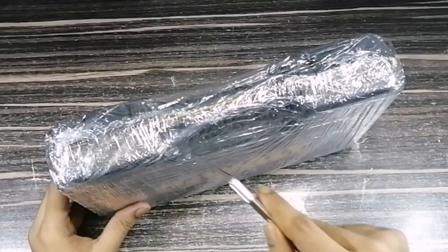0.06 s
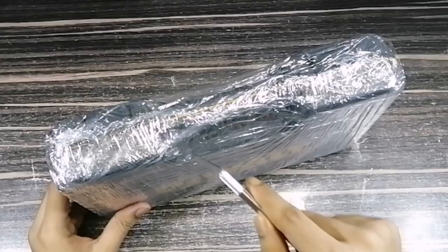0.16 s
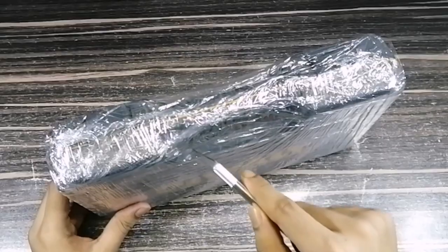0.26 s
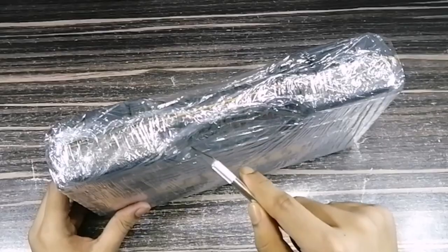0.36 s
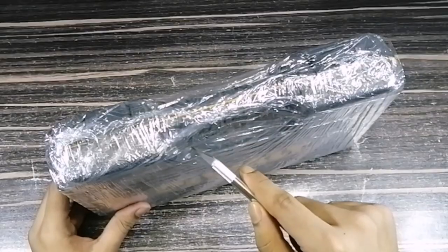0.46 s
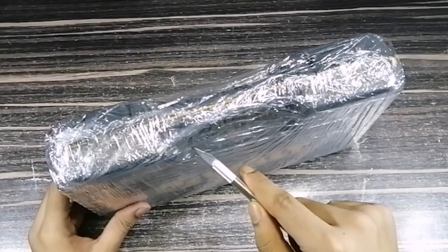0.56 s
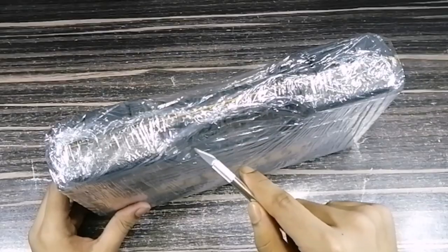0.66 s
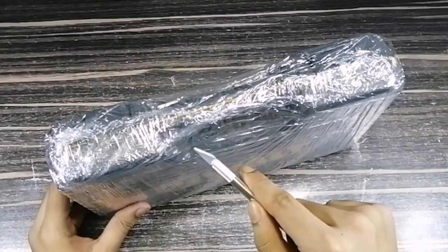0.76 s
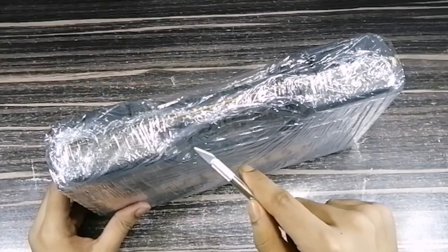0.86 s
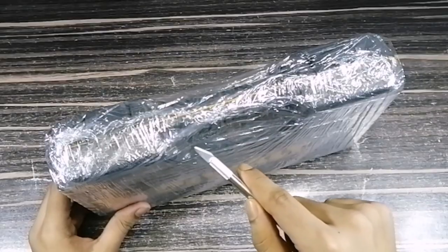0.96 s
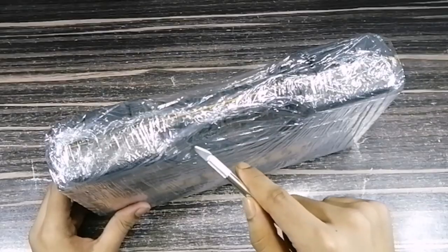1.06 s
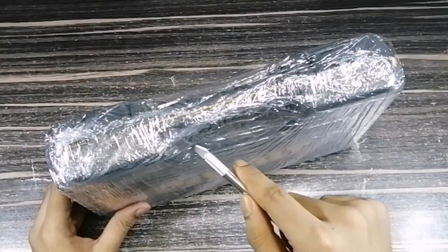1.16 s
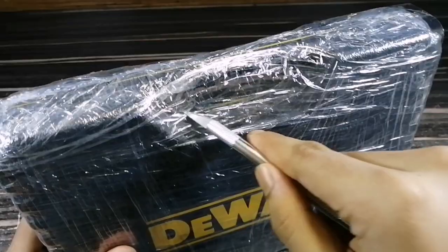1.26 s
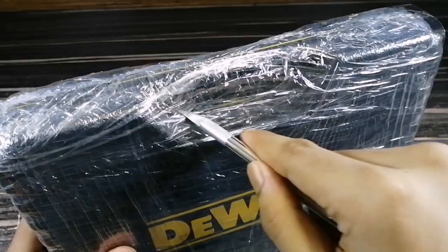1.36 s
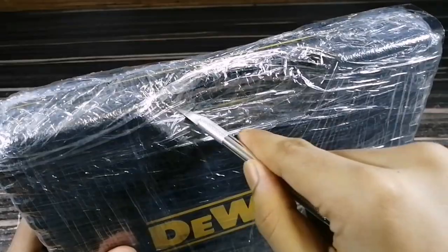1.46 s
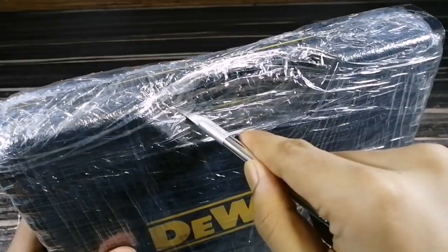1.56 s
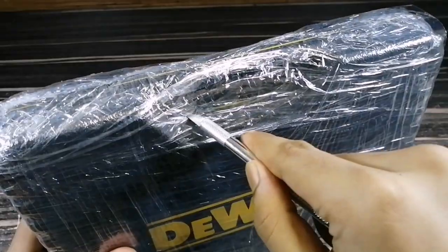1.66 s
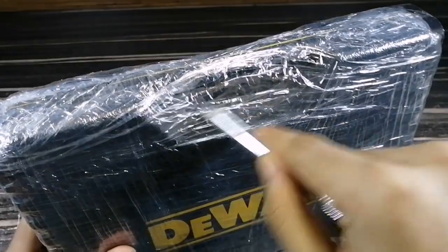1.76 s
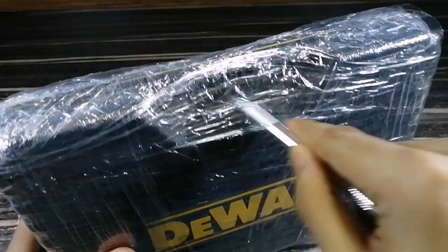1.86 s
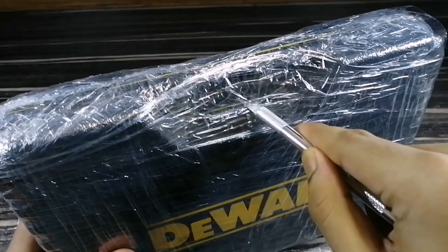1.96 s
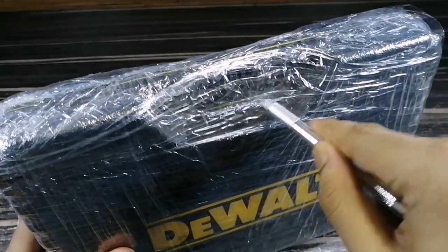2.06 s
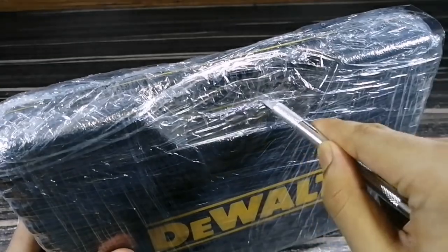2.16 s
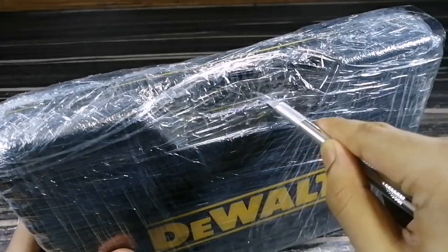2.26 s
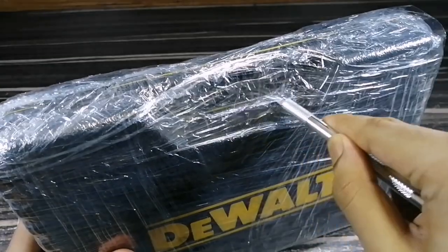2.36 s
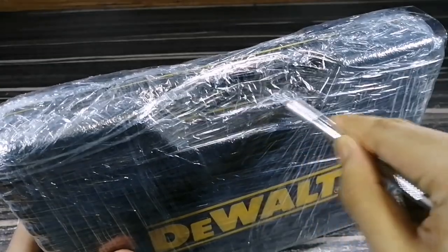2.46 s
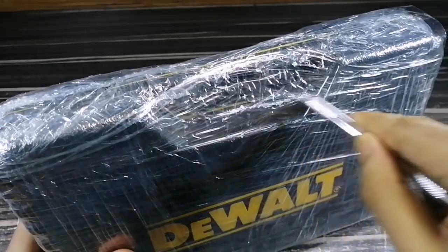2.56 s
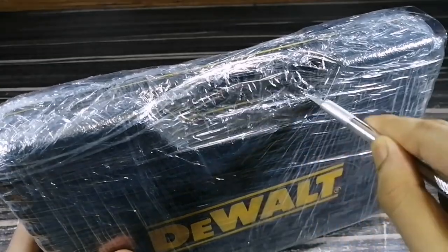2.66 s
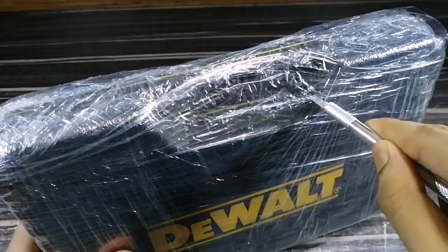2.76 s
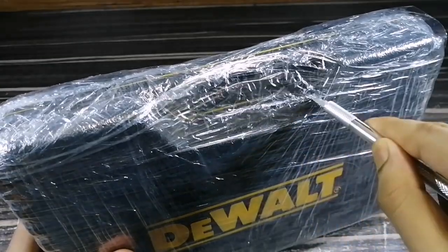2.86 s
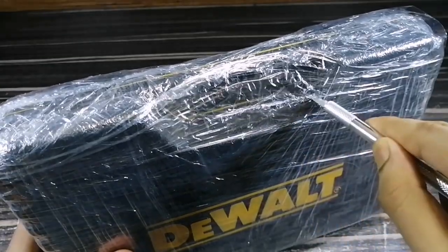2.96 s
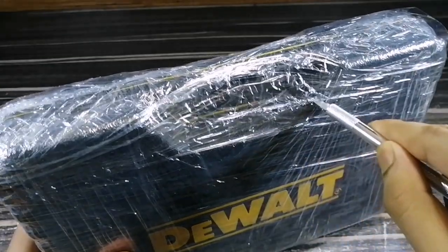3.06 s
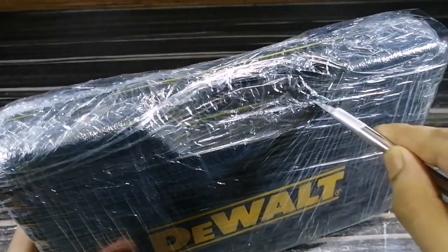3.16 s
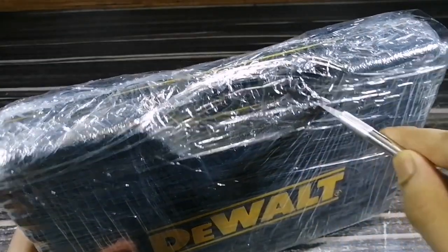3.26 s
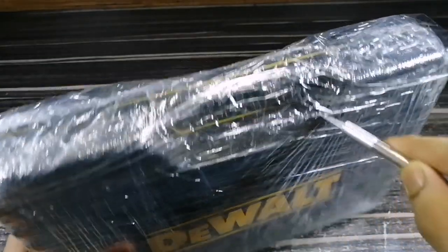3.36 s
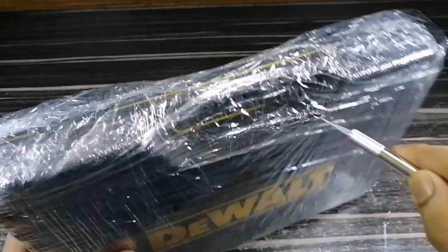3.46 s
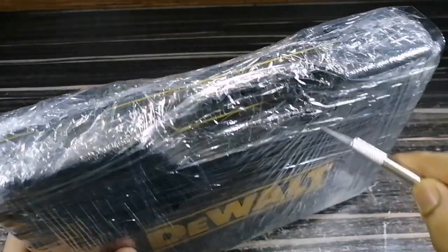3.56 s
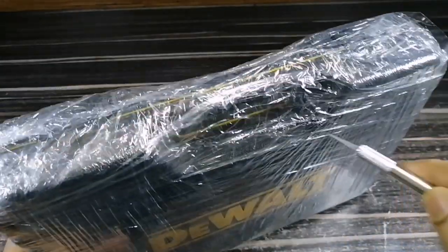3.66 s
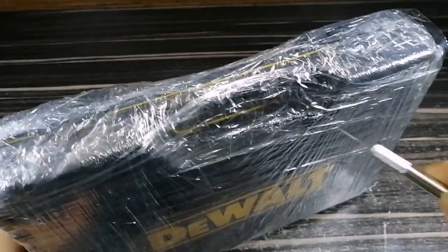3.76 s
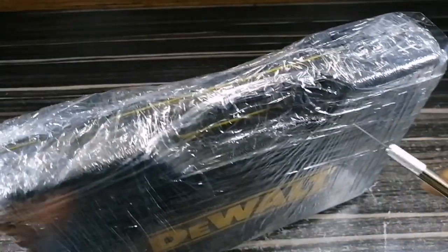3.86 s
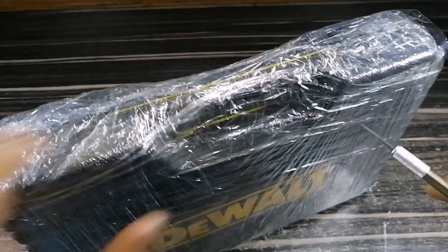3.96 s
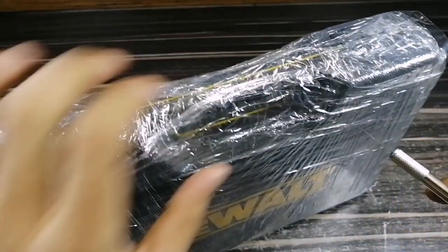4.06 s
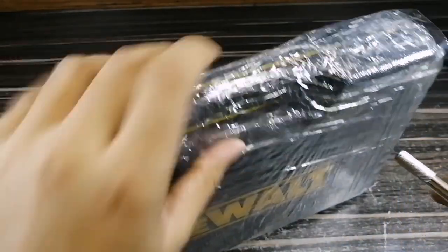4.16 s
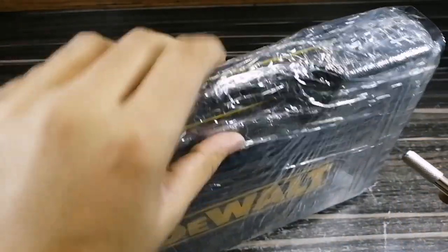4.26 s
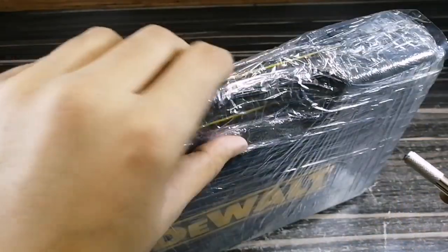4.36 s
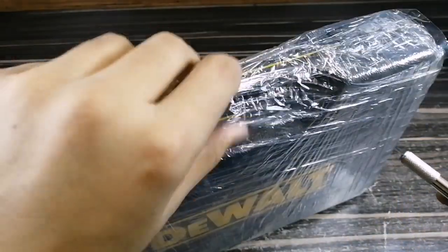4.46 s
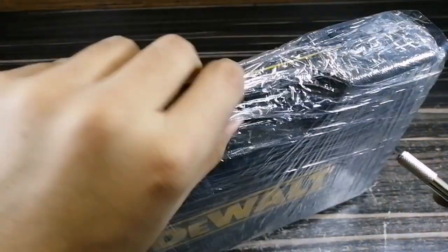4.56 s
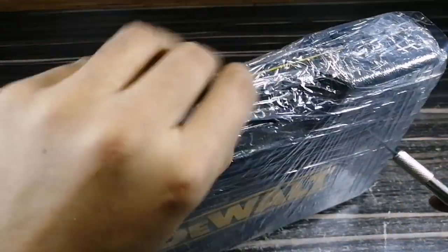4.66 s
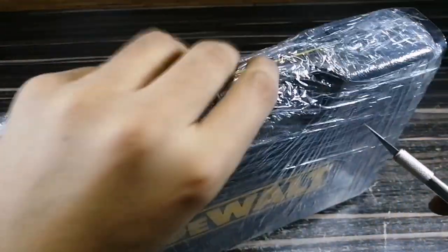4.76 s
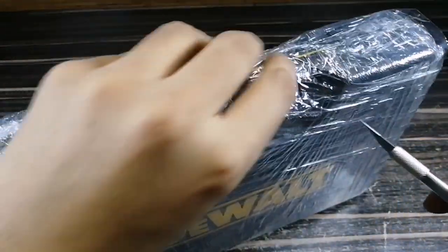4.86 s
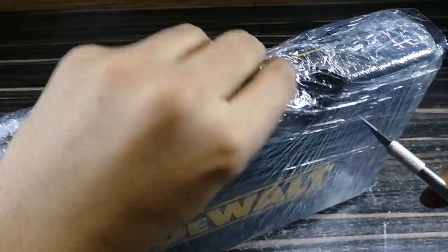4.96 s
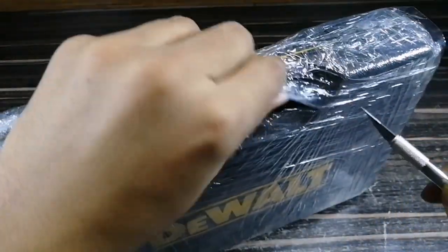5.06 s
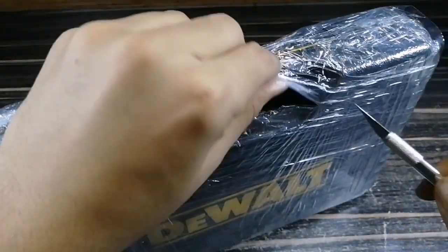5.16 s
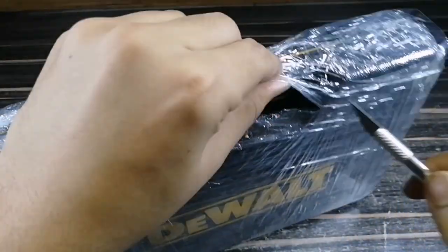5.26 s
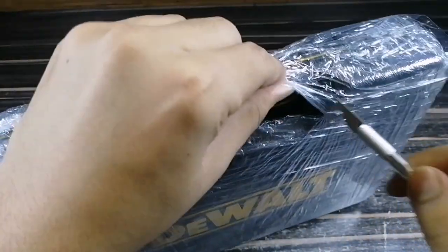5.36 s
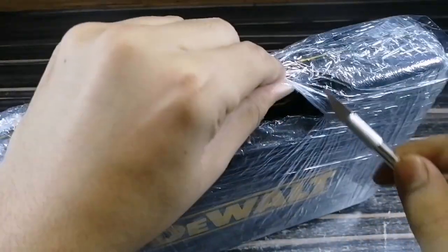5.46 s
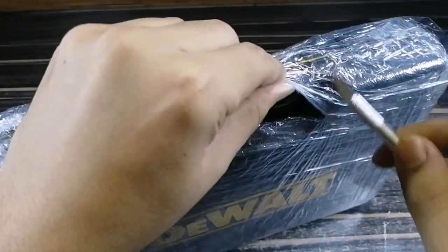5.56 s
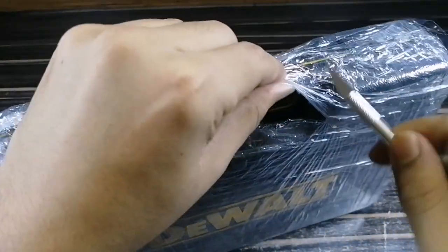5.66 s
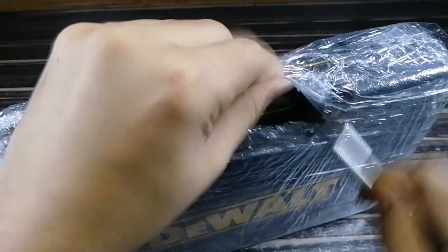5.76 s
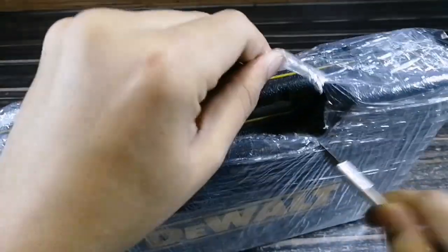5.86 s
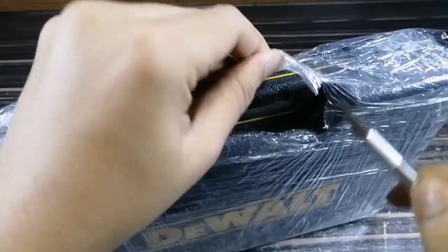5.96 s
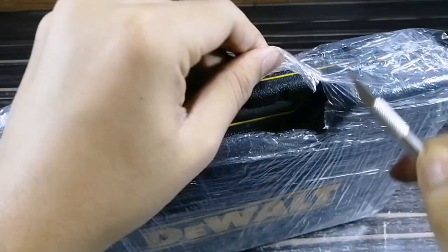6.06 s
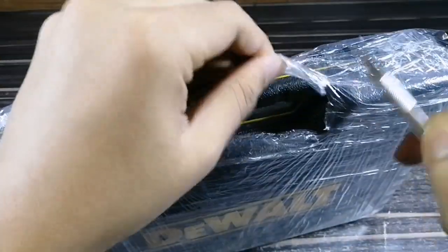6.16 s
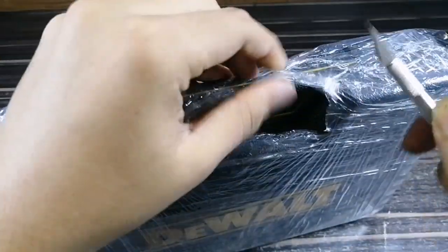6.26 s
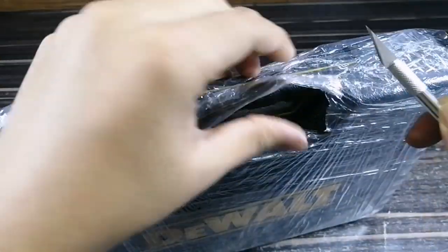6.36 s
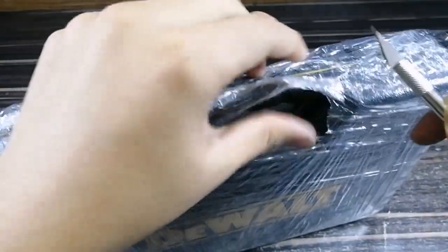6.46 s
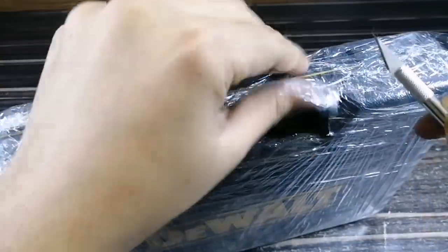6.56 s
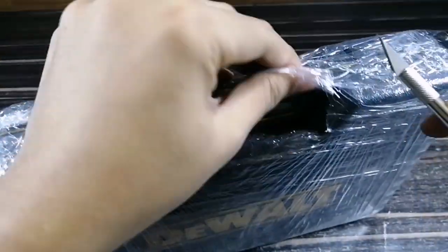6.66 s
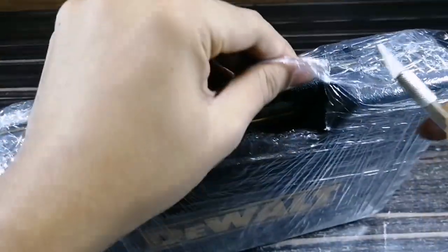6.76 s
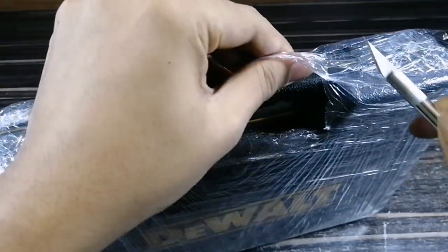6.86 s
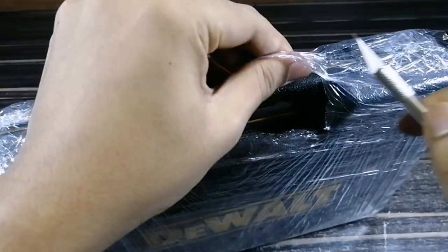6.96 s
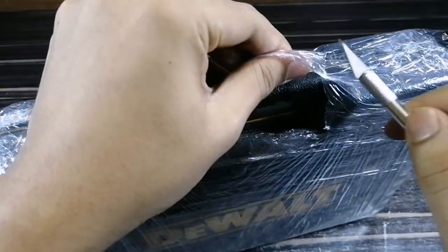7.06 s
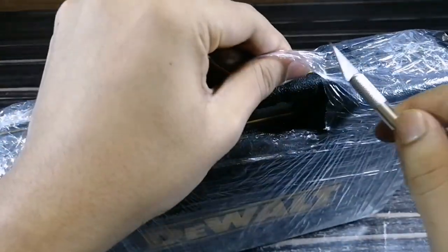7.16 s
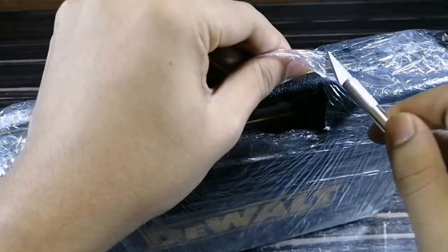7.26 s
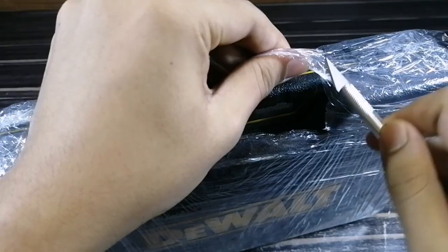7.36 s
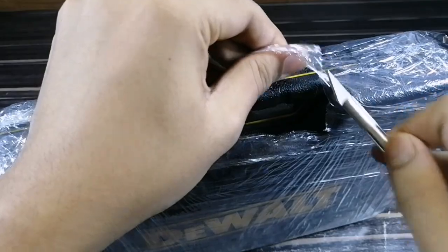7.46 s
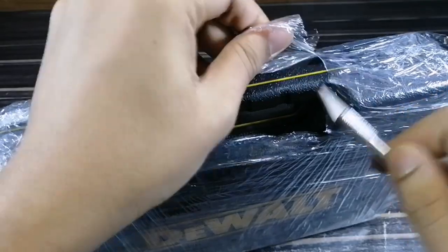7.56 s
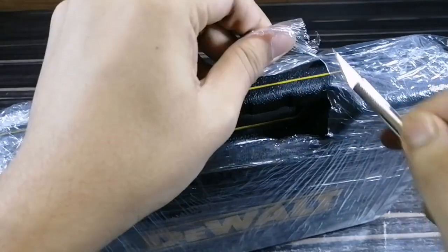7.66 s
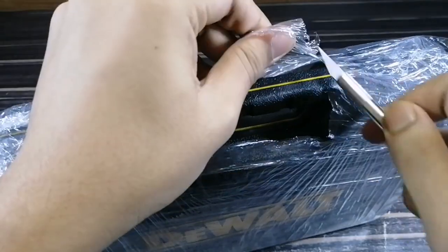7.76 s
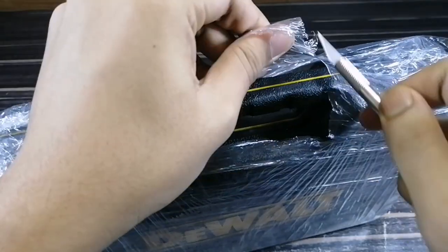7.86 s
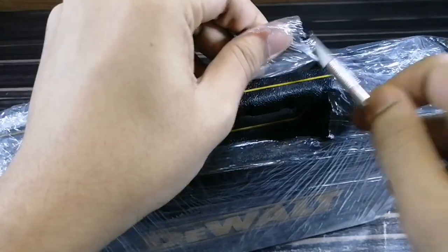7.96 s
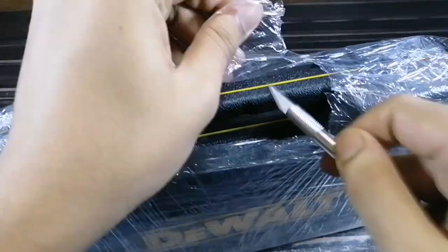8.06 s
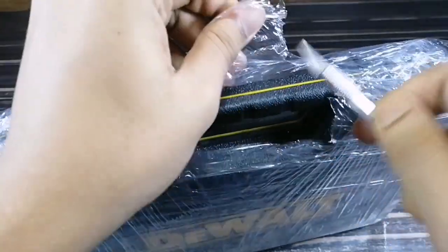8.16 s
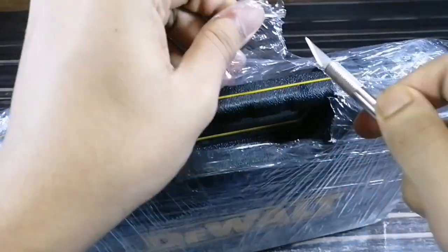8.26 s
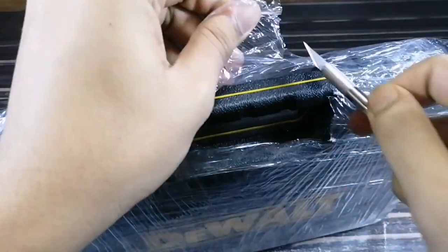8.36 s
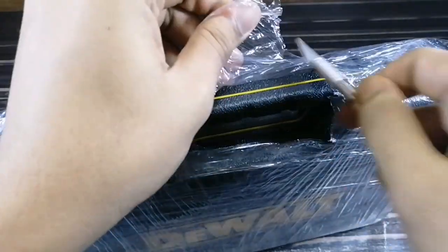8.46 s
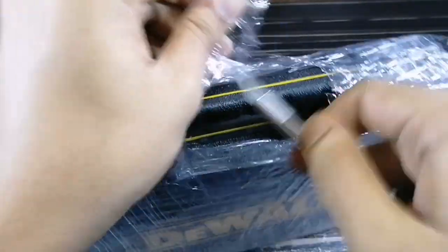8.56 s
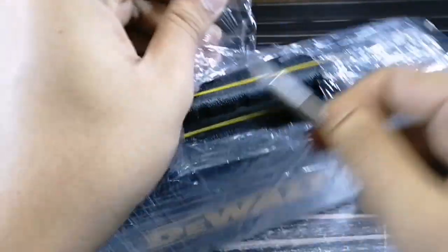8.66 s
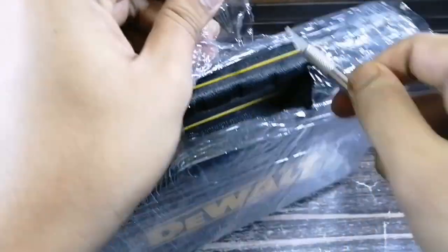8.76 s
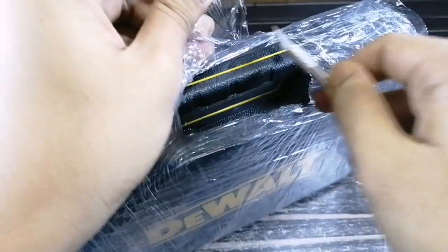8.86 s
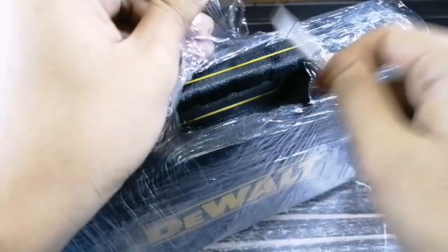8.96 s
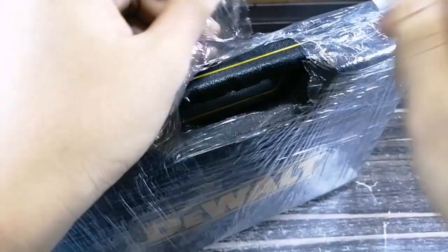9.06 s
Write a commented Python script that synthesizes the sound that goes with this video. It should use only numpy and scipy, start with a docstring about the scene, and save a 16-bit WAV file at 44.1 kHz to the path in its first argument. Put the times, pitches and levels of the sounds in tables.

```python
"""A faint rasp of plastic, a few ticks, a short scrape: a craft knife slits the stretch wrap on a hollow
plastic tool case, then a hand picks at the film and rips it off. Taut folds snap, tears run as bursts
of tiny ruptures, loose film crinkles, and the case thumps on the table. The place is a small room,
with the microphone pair close to the work, so the loudest rips overload it."""
import sys
import numpy as np
from scipy import signal
from scipy.fft import rfft, irfft, next_fast_len
from scipy.io import wavfile
from scipy.ndimage import map_coordinates

SR = 44100
rng = np.random.default_rng(int(sys.argv[2]) if len(sys.argv) > 2 else 0)


def generate_wav(sig):
    """Save sig (samples, or channels by samples) to the path in sys.argv[1] as 16-bit PCM at SR."""
    pcm = np.round(np.clip(np.atleast_2d(sig).T, -1, 1) * 32767).astype(np.int16)
    wavfile.write(sys.argv[1], SR, pcm)


N = 401751

# film drawn tight, rasping louder until it gives: t/s, length/s, final level/dB, body/dB
STRETCHES = [(1.763, 0.033, -28.5, 6.5), (1.833, .022, -16, 8), (3.727, 0.036, -31, 0),
             (4.004, 0.036, -22.5, -9), (4.537, .064, -25.5, 4), (5.789, 0.06, -28.5, -7.5),
             (6.398, 0.019, -21.5, -3), (8.544, 0.033, -27.5, -7), (9.072, 0.038, -29, -6)]
# tears running through the film: t/s, length/s, opening level/dB, body/dB
TEARS = [(0.319, 0.068, -44.5, 8.5), (1.9, 0.0087, -14, 13), (1.934, 0.0069, -6, 4.5),
         (2.083, 0.092, -26.5, -1), (2.387, 0.0052, -6.5, 5), (2.391, 0.021, -23.5, 3.5),
         (2.5654, 0.0046, -4, 10.5), (2.602, 0.017, -16.5, 10.5), (2.649, 0.03, -23, 10.5),
         (3.763, 0.057, -20.5, -5.5), (5.071, .058, -26.5, -4), (5.837, 0.014, -19, -13),
         (5.848, 0.017, -1, -8.5), (5.867, 0.035, -12.5, -4.5), (7.572, 0.006, 5.5, -13),
         (7.577, 0.034, -12, -1), (8.018, 0.0054, -4.5, -12.5), (8.024, 0.024, -23, -13),
         (8.071, 0.057, -1.5, -3), (8.142, 0.038, -15, -5), (8.2193, 0.0071, -5, -6),
         (8.237, 0.0053, -11, 7), (8.57, 0.061, -9.5, -2), (8.639, 0.059, -15.5, -2.5)]
# folds snapping; film taut on the case has more body: t/s, level/dB, body/dB
SNAPS = [(1.0025, -30, 3), (1.064, -24.5, -9), (1.4484, -26.5, -4), (1.5612, -26, -1), (1.7448, -26, 16),
         (1.7823, -17, 15), (1.801, -10, -9), (1.8333, -17, 0), (1.8517, -1, 7), (1.9951, -9, 10),
         (2.0873, -11, 13), (2.1096, -19, -3), (2.1207, -13, 10.5), (2.1264, -11, 8), (2.1931, -16.5, -10),
         (2.3371, -21, -1), (2.45, -12, -2), (2.5004, -23, -3), (2.6261, -7, -4.5), (2.6568, -9, 15),
         (2.6674, -3.5, -13), (2.6756, -12, 3), (2.6904, -9, -19), (2.735, -15, 7.5), (2.909, -30, -5),
         (3.071, -35, 2), (3.5649, -8, -1), (3.5821, -12, 2), (3.7703, 2, -41), (4.03, -6.5, -24),
         (4.5885, -15, -12), (4.6641, -18, 10.5), (4.7357, -13.5, 16.5), (4.8048, -15, 11.5),
         (4.9686, -37, 10), (5.0694, -15.5, 0), (5.1105, -0.5, 0), (5.1754, -14, -23), (5.1994, -10.5, -10),
         (5.2209, -15.5, 0), (5.2471, -14.5, -16), (5.3843, -11.5, -9), (5.4098, -10, -7),
         (5.476, -17.5, 10.5), (5.6153, -23, -10), (5.8694, 2.5, -5.5), (5.89, 0, -9), (6.0807, -15.5, 7),
         (6.1592, -21, -36), (6.294, -14, -7), (6.3486, -13.5, -1), (6.417, -18, 18.5), (6.6574, -15, -22),
         (6.7418, -17.5, -32), (6.8753, -18, -36), (7.009, -18.5, -20), (7.0172, -10.5, -34),
         (7.2095, -15.5, -24), (7.299, -27.5, -6), (7.3698, -25.5, -7), (7.407, -24, -22),
         (7.4964, -14.5, -26), (7.525, -12.5, -22), (7.8694, -9.5, -14), (7.8792, -14, -1.5),
         (7.9551, -21.5, 3), (7.9937, -9.5, -17), (8.1315, 4.5, 3), (8.318, -15, -6), (8.3557, -15, -3),
         (8.442, -18.5, -12), (8.5775, 0.5, 1.5), (8.6278, 3.5, -6), (8.6531, -4, -7), (8.6574, 1.5, 6),
         (8.6882, -5, 4), (8.7327, -11.5, 9), (8.9034, -19, -36), (9.0608, -20.5, -9)]
# stages of one snap, from needle through crack to shivering sheet: level/dB, t60/s
SNAP_STAGES = [(5, 0.0011), (-6, 0.0022), (-12.5, 0.04), (-27, .06)]
# spectrum of breaking film, close up: f/Hz, level/dB
FILM_TONE = [(88, -60.5), (150, -7.5), (291, -10.5), (347, -13), (575, -9), (850, -13.5), (1120, -4),
             (1520, -9.5), (1930, -5), (2210, -7.5), (3740, -6), (7250, 4.5), (8980, -4), (14900, -6),
             (15800, -13)]
# case panels driven by the film: f/Hz, width/Hz, gain/dB
PANELS = [(590, 230, 2), (896, 114, -2), (1120, 120, -5), (1820, 95, 1.5), (2640, 1100, 2.5),
          (3820, 1500, 1.5), (7100, 880, -1)]
# the stretched sheet letting go like a slack drumskin: t/s, level/dB, f/Hz
POPS = [(5.851, -15.5, 1330), (8.075, -2, 2810), (8.087, -4.5, 1080), (8.095, -5, 2840),
        (8.104, -9.5, 1110), (8.131, -10, 1170), (8.224, -7.5, 1040), (8.578, -10.5, 1090)]
# blade and fingers moving over loose film: t/s, length/s, crinkle/dB, rub/dB
MOVES = [(1.026, 0.14, -50, -53.5), (1.267, .2, -47.5, -53), (1.736, .42, -44, -51), (2.432, .35, -52, -56),
         (2.83, 0.12, -52.5, -62), (3.22, 0.076, -51.5, -62), (3.446, 0.15, -43, -50.5),
         (3.635, .23, -41, -59), (4.193, 0.17, -38.5, -49.5), (4.423, 0.25, -44.5, -51),
         (4.684, .33, -39.5, -48), (5.06, .29, -40.5, -52), (5.415, 0.089, -44.5, -50.5),
         (5.795, .38, -40.5, -55), (6.259, 0.14, -32.5, -51), (6.541, 0.11, -40, -47.5),
         (6.672, .21, -40.5, -58.5), (7.034, 0.079, -49.5, -57), (7.471, .13, -36.5, -51),
         (7.73, 0.079, -51, -57), (8.077, .32, -37.5, -45.5), (8.408, 0.12, -50, -50.5),
         (8.632, .25, -40, -49), (8.94, .17, -42.5, -53)]
# spectrum of crinkling film: f/Hz, level/dB
CRINKLE_TONE = [(1500, -31.5), (2500, -14.5), (3400, -11), (5000, -5.5), (7300, 0), (9500, -7), (12500, -9),
                (15000, -7.5), (16000, -7)]
# spectrum of film rubbed on the case: f/Hz, level/dB
RUB_TONE = [(250, -27), (500, -2), (800, -10), (1200, 0), (1850, -1.5), (2400, -2.5), (3200, -4),
            (5000, -11)]
# modes of the hollow case: f/Hz, level/dB, t60/s
CASE_MODES = [(80.5, -11.5, 0.32), (107.3, 3, 0.35), (119, -9, 0.2), (168.7, -0.5, 0.36), (205.5, -3, 0.35),
              (233.2, -7.5, 0.49), (280, 13, 0.068), (324, -3, 0.19), (380, -6.5, 0.13), (464, -4.5, 0.065),
              (568, -0.5, 0.014)]
# hard knocks on the case: t/s, level/dB, hardness/(dB per octave)
KNOCKS = [(1.836, -29, 3), (1.9, -31, 4), (1.935, -27, 1.5), (2.087, -23, 15), (2.389, -17, 19),
          (2.569, -20.5, 2), (2.611, -31, 3), (2.656, -27, 3), (4.544, -31, 1), (4.737, -22.5, 30),
          (5.111, -17.5, 43), (6.418, -26, 16), (8.689, -9.5, 15.5), (8.734, -14.5, 12)]
# soft pushes and tugs on the case: t/s, level/dB, rise/s
PUSHES = [(3.566, -30.5, 0.0028), (3.714, -10.5, 0.065), (3.783, -21.5, 0.026), (3.93, -15, 0.039),
          (4.185, -26, .013), (4.254, -22, 0.0069), (4.78, -22.5, 0.011), (5.855, -23, 0.0019),
          (6.56, -26.5, .004), (7.575, -30.5, .0046), (8.081, -22, 0.0078), (8.161, -17.5, 0.018)]
# spectrum of the blade tip dragged along the case: f/Hz, level/dB
SCRAPE_TONE = [(900, -32), (1500, -18), (1850, -3), (2300, -9), (3500, -22), (8000, -35)]
# the table stirring as the hands shift their weight: t/s, length/s, level/dB
STIRS = [(3.43, 0.1, -41.5), (3.66, 0.94, -49), (5.61, 0.039, -49), (5.85, .05, -55), (7.55, 0.12, -47),
         (8.08, 0.33, -50)]
# spectrum of the table's rumble: f/Hz, level/dB
RUMBLE_TONE = [(15, 5.5), (30, -5), (55, 3), (85, -15), (140, -4), (400, -57)]
# decay of the small room: f/Hz, t60/s
ROOM_DECAY = [(150, 0.46), (1000, 0.28), (4000, 0.35), (7500, 0.3), (15000, 0.32)]
# colour of the wall reflections: f/Hz, level/dB
WALL_TONE = [(100, -5.5), (1000, 2.5), (7000, -1.0), (15000, 2.5)]
# spectrum of the room tone: f/Hz, level/dB
ROOM_TONE = [(15, -80), (25, -34), (48, -7), (80, -13), (123, -2.5), (194, -12.5), (248, -8.5),
             (276, -10.5), (352, -9), (392, -8.5), (437, -15.5), (691, -17.5), (749, -14.5), (1390, -29),
             (15800, -36.5)]
# close sound across the microphone pair: f/Hz, left-right correlation
CLOSE = [(100, 1), (500, 0.76), (1200, 0.94), (2200, 0.19), (3500, 0), (15000, 0)]
# diffuse sound across the pair: f/Hz, left-right correlation
DIFFUSE = [(30, 0.39), (100, 0.97), (300, 0.81), (700, 0.51), (1200, 0), (3000, 0.12)]
# imbalance of the two microphone ports: f/Hz, left minus right/dB
PORT_BALANCE = [(300, -1), (3000, -1), (6000, -2), (6700, -1), (7300, 5.5), (8500, 1.5), (11000, -0.5),
                (14500, -2.5), (16000, 9)]


def tears(swell_db=3, fall_db=1, slacken_db_per_s=113):
    """The film rasps louder as it is stretched; a running tear weakens as the tension goes."""
    out = np.zeros((2, N))
    for s, length, db, body_db in STRETCHES:
        add(out, s, rip(length, db - swell_db, swell_db, body_db))
    for s, length, db, body_db in TEARS:
        add(out, s, rip(length, db, -fall_db - slacken_db_per_s * length, body_db))
    return out


def rip(length, db, change_db, body_db, open_s=0.0018, stop_t60=0.011):
    """A dense chain of ruptures whose pull changes by change_db over its length."""
    t = np.arange(SR // 6) / SR
    run_db = change_db * np.minimum(t / length, 1)
    stop_db = -60 * np.maximum(t - length, 0) / stop_t60
    pull = amp(db + run_db + stop_db) * (1 - np.exp(-t / open_s))
    chain = ruptures(len(t), per_s=3000, spread_db=4.8, life_s=.0005)
    # the stored tension sets the energy
    chain *= np.sqrt(np.sum(pull ** 2) / np.sum(np.mean(chain ** 2, 0) * pull ** 2))
    edge_db = 0.36 * body_db  # tauter film breaks more crisply
    return film(pull * chain, body_db, edge_db, ripple_db=1)


def snaps(rise_s=.00005):
    """A fold buckles with a needle-sharp crack, then the sheet shivers briefly."""
    out, t = np.zeros((2, N)), np.arange(SR // 25) / SR
    fade = sum(amp(db - 60 * t / t60) for db, t60 in SNAP_STAGES)
    fade *= 1 - np.exp(-t / rise_s)
    for s, db, body_db in np.vstack([SNAPS, stray_folds()]):
        crack = fade * rng.choice([-1, 1], (2, len(t)))
        edge_db = 2.5 * rng.standard_normal()
        add(out, s, amp(db) * film(crack, body_db, edge_db, ripple_db=5.0))
    return out


def stray_folds(count=30, over_crinkle_db=18.5, mean_body_db=-8):
    """Stray folds give at random while the hands move, more of them and louder under a harder grip."""
    s, length, crinkle_db, _ = np.transpose(MOVES)
    share = np.cumsum(length * amp(crinkle_db / 2))
    which, when, force, tautness = rng.random((count, 4)).T
    move = np.searchsorted(share / share[-1], which)
    level_db = crinkle_db[move] + over_crinkle_db + 8 * (force - .5)
    body_db = mean_body_db + 20 * (tautness - .5)
    return np.column_stack([s[move] + length[move] * when, level_db, body_db])


def film(crack, body_db, edge_db, ripple_db):
    """Film anchored on the case drives its panels; a crisp break adds top edge."""
    # each fold has its own broad colour
    fold = np.column_stack([np.geomspace(400, 16000, 12), ripple_db * rng.uniform(-1, 1, 12)])
    mid_db = 0.24 * body_db  # slack film loses its middle too
    tension = [(200, body_db), (1750, body_db), (3300, mid_db), (6000, 0), (8000, 0), (10500, edge_db)]

    def colour(hz):
        panels = sum(db / (1 + (2 * (hz - centre) / width) ** 2) for centre, width, db in PANELS)
        return along(FILM_TONE, hz) + along(tension, hz) + along(fold, hz) + panels
    return coloured(crack, colour, CLOSE)


def ruptures(size, per_s, spread_db, life_s):
    """Randomly timed micro-cracks, their strengths scattered by spread_db; two channels, rms 1."""
    onsets = rng.random(size) < per_s / SR
    strength = amp(spread_db * np.clip(rng.standard_normal(size), -2, 2))
    power = signal.lfilter([1], [1, -np.exp(-2 / (life_s * SR))], onsets * strength ** 2)
    return unit(np.sqrt(power + 1e-6) * rng.standard_normal((2, size)))


def pops(rise_s=0.00048, sag_s=0.0022, t60=0.022):
    """The freed sheet swings briefly, its pitch sagging with the tension."""
    out, t = np.zeros(N), np.arange(SR // 20) / SR
    for s, db, hz in POPS:
        pitch = hz * (1 + 0.15 * np.exp(-t / sag_s))
        swing = amp(db - 60 * t / t60) * (1 - np.exp(-t / rise_s))
        add(out, s, swing * np.sin(2 * np.pi * np.cumsum(pitch) / SR))
    return np.array([out, out])


def handling(rest_db=-60.5):
    """Loose film crinkles in tiny grains and sparser ticks as blade and fingers rub it on the case."""
    s, length, crinkle_levels, rub_levels = np.transpose(MOVES)
    grip_db = 1.8 * wobble(35)
    crinkle_db = effort(zip(s, length, crinkle_levels), rest_db) + grip_db
    rub_db = effort(zip(s, length, rub_levels), rest_db) + grip_db
    crinkle = 0
    for db_per_octave in (-3, 3):  # broad folds sound duller, narrow ones brighter
        def colour(hz):
            return along(CRINKLE_TONE, hz) + db_per_octave * np.log2(np.maximum(hz, 2000) / 7000)
        grains = ruptures(N, per_s=800, spread_db=0, life_s=0.0011)
        ticks = amp(-4.5) * ruptures(N, per_s=83, spread_db=3.5, life_s=0.0012)
        crinkle += coloured(grains + ticks, colour, CLOSE)[:, :N]
    friction = ruptures(N, per_s=3800, spread_db=17.5, life_s=0.0068)
    return amp(crinkle_db) * unit(crinkle) + amp(rub_db) * toned(friction, RUB_TONE, CLOSE)


def case(knock_rise_s=0.001, push_db_per_octave=-11.5):
    """Soft pushes wake the low boom of the hollow case; hard knocks reach its higher modes."""
    out, t = np.zeros(N), np.arange(SR // 2) / SR
    hz, mode_db, t60 = np.transpose(CASE_MODES)[:, :, None]
    knocks = [(s, db, hardness, knock_rise_s) for s, db, hardness in KNOCKS]
    pushes = [(s, db, push_db_per_octave, rise_s) for s, db, rise_s in PUSHES]
    for s, db, hardness, rise_s in knocks + pushes:
        gains = amp(mode_db + hardness * np.log2(hz / hz[0]) + rng.normal(0, 1, hz.shape))
        held_hz = hz * (1 + 0.018 * rng.standard_normal(hz.shape))  # the grip shifts the modes
        ring = gains / np.linalg.norm(gains) * amp(-60 * t / t60) * np.sin(2 * np.pi * held_hz * t)
        add(out, s, amp(db) * ring.sum(0) * (1 - np.exp(-t / rise_s)))
    return np.array([out, out])


def blade(start_s=1.23, length_s=0.19, level_db=-55):
    """The blade tip sticks and slips on the case, rasping in one panel resonance."""
    slips = ruptures(N, per_s=500, spread_db=4, life_s=.002)
    drag_db = effort([(start_s, length_s, level_db)], rest_db=-120)
    return amp(drag_db) * toned(slips, SCRAPE_TONE, CLOSE)


def table():
    """Shifting hands make a deep, soft rumble in the table."""
    rumble = toned(rng.standard_normal((2, N)), RUMBLE_TONE, DIFFUSE)
    return amp(effort(STIRS, rest_db=-69)) * rumble


def room(direct, delay_s=.005):
    """The near walls answer, differently as the hands move about: a fresh tail every half second."""
    out, step = np.zeros((2, N)), SR // 2
    for start in range(0, N, step):
        hz, t, noise = signal.stft(rng.standard_normal((2, step)), SR, nperseg=256)
        decay = amp(-60 * t / along(ROOM_DECAY, hz)[:, None])
        _, tail = signal.istft(noise * decay, SR, nperseg=256)
        wet = signal.fftconvolve(direct[:, start:start + step], tail / np.linalg.norm(tail[0]), axes=1)
        add(out, start / SR + delay_s, wet)
    return toned(out, WALL_TONE, DIFFUSE)


def room_tone(level_db=-49.5):
    """Low, slightly wavering noise from all round the microphones."""
    noise = toned(rng.standard_normal((2, N)), ROOM_TONE, DIFFUSE)
    return amp(level_db + 0.29 * wobble(10.0)) * noise


def effort(moves, rest_db, attack_db_per_s=195, release_db_per_s=170):
    """Level in dB of hand moves (t/s, length/s, level/dB): each swells, holds and relaxes to rest."""
    t, level = np.arange(N) / SR, np.full(N, float(rest_db))
    for s, length, db in moves:
        before_db = attack_db_per_s * np.maximum(s - t, 0)
        after_db = release_db_per_s * np.maximum(t - s - length, 0)
        level = np.maximum(level, db - before_db - after_db)
    return level


def coloured(x, colour, correlation):
    """Two unrelated signals as a stereo pair, through a causal unit-power filter of colour(hz) dB."""
    size = 2 * next_fast_len(x.shape[1] // 2 + SR // 40)
    hz = np.fft.rfftfreq(size, 1 / SR)
    gain = np.maximum(unit(amp(colour(hz))), 1e-4)
    cepstrum = irfft(np.log(gain))
    cepstrum[1:size // 2] *= 2  # minimum phase keeps the attacks sharp
    cepstrum[size // 2 + 1:] = 0
    spread = np.arccos(np.clip(along(correlation, hz), -1, 1)) / 2
    mid, side = irfft(rfft(x, size) * np.exp(rfft(cepstrum)) * [np.cos(spread), np.sin(spread)])
    return np.array([mid + side, mid - side])


def toned(x, tone, correlation):
    """A scene-long stereo pair coloured by one spectrum table."""
    return coloured(x, lambda hz: along(tone, hz), correlation)[:, :N]


def along(points, hz):
    """Interpolate (f/Hz, value) points on a log axis."""
    f, value = np.transpose(points)
    return np.interp(np.log(hz + 1), np.log(f + 1), value)


def wobble(per_s):
    """A smooth random curve with per_s knots a second."""
    knots = rng.standard_normal(int(N * per_s / SR) + 4)
    return map_coordinates(knots, [np.arange(N) * per_s / SR])


def add(track, s, x):
    """Mix x into the track at time s."""
    start = max(0, round(s * SR))
    part = track[..., start:start + x.shape[-1]]
    part += x[..., :part.shape[-1]]


def amp(db):
    """Decibels to gain."""
    return 10 ** (np.asarray(db) / 20)


def unit(x):
    """Scale to rms 1."""
    return x / np.sqrt(np.mean(x ** 2) + 1e-20)


def scene():
    """Film and case close to the microphones, the table and the small room behind them."""
    direct = snaps() + tears() + pops() + handling() + blade() + case()
    return direct + amp(-8.0) * room(direct) + table() + room_tone()


def record(dry, top_hz=16020):
    """The two microphone ports colour the treble differently; peaks overload; the top is cut off."""
    size = next_fast_len(N + SR // 4)
    hz = np.fft.rfftfreq(size, 1 / SR)
    ports = amp(np.outer([.5, -.5], along(PORT_BALANCE, hz)))
    picked_up = irfft(rfft(dry, size) * ports, size)
    overloaded = picked_up / (1 + np.abs(picked_up) ** 6) ** (1 / 6)
    return irfft(rfft(overloaded) / (1 + (hz / top_hz) ** 120), size)[:, :N]


dry = scene()
out = record(dry)
generate_wav(out)
```